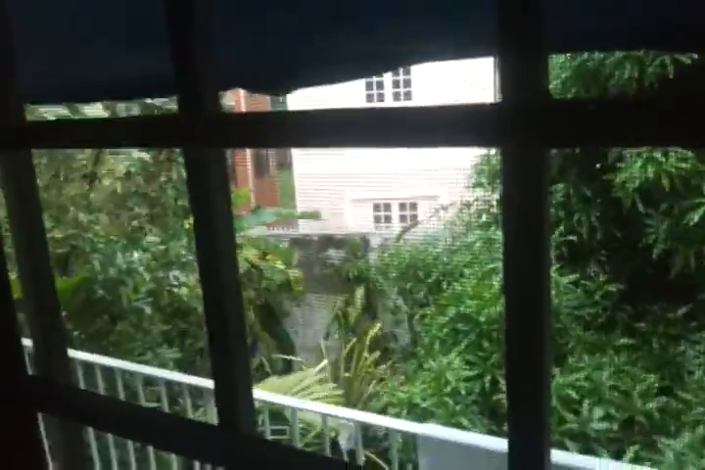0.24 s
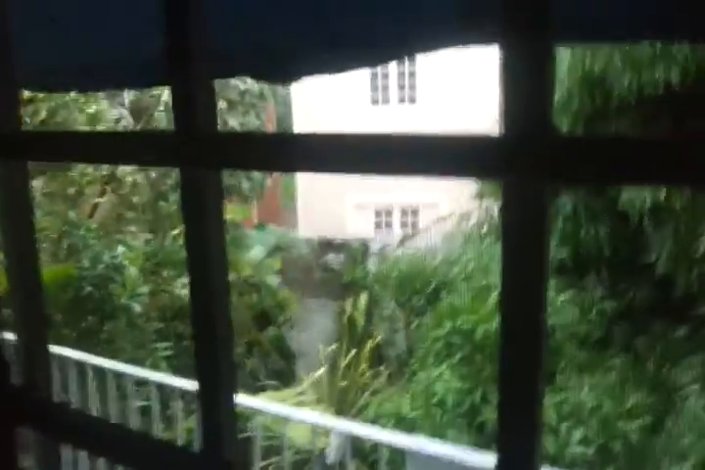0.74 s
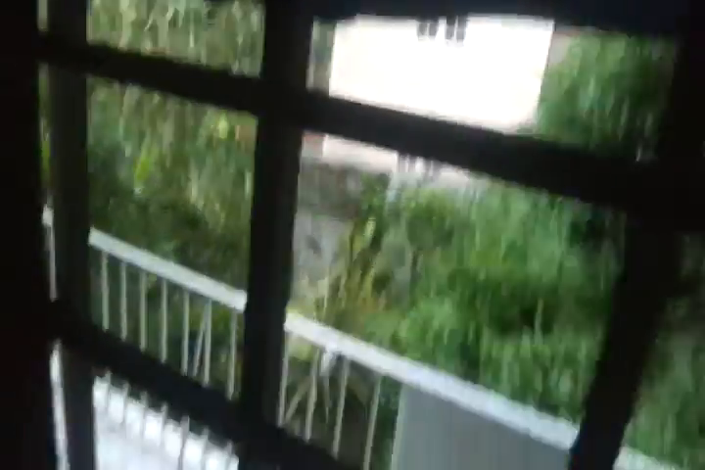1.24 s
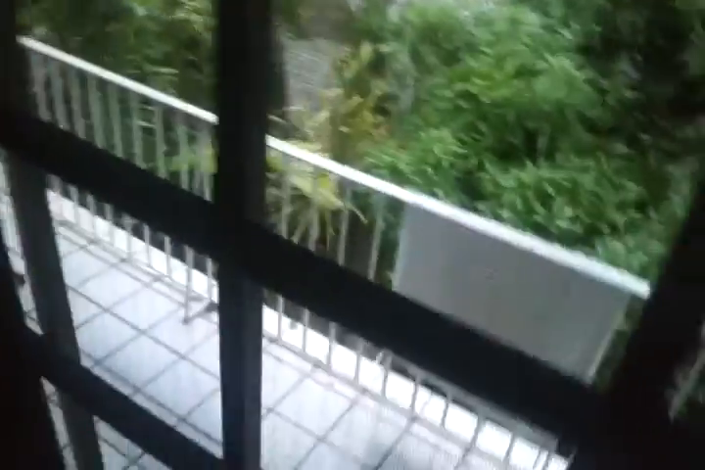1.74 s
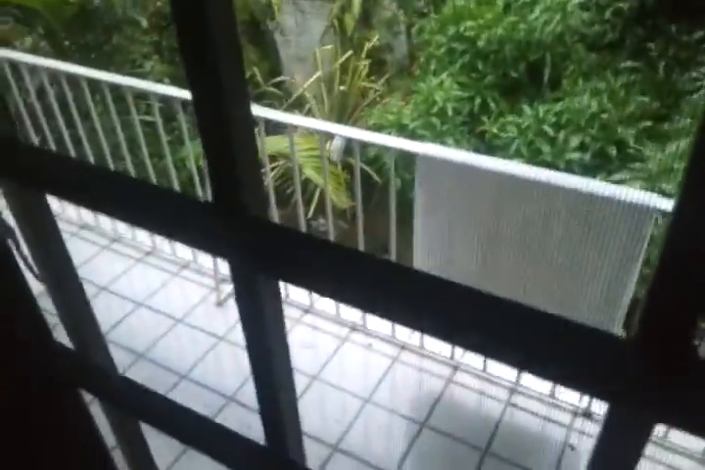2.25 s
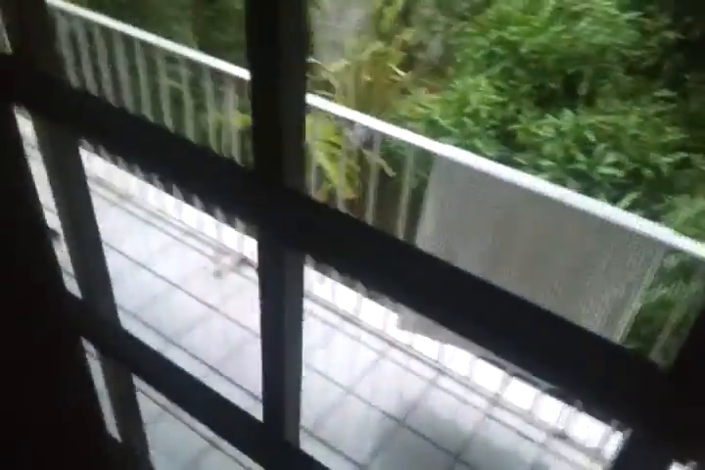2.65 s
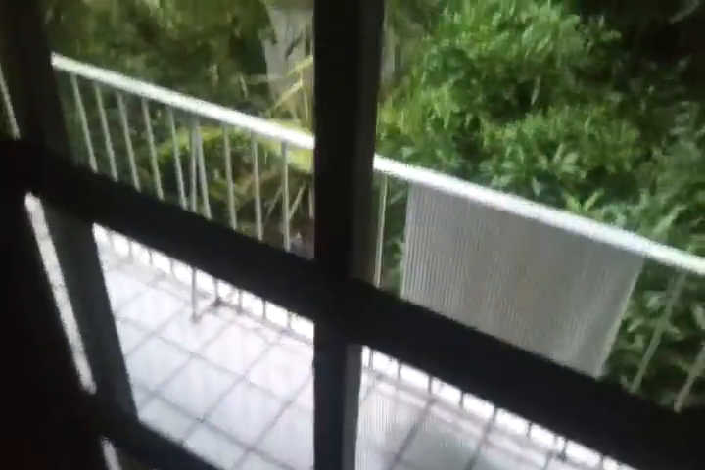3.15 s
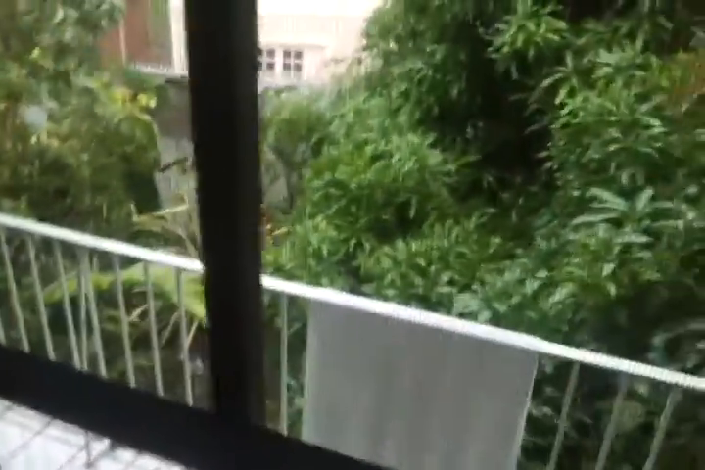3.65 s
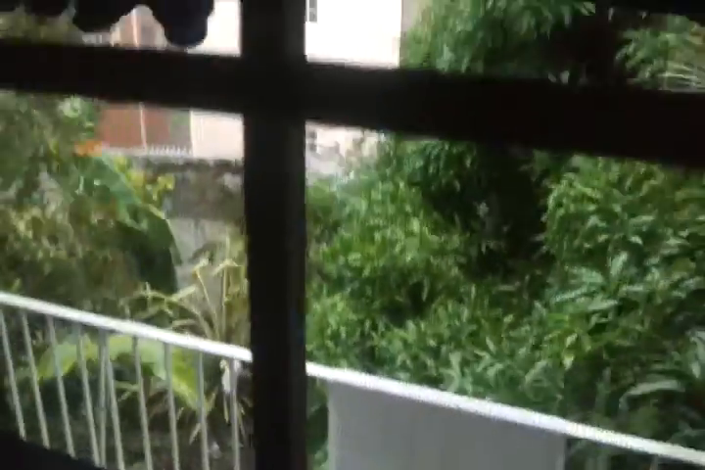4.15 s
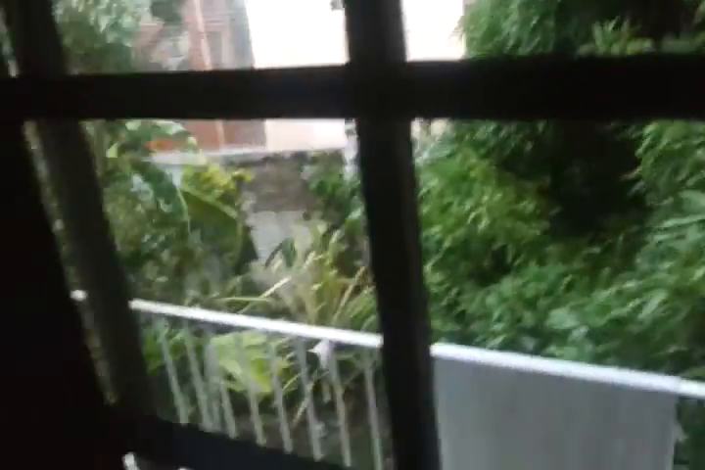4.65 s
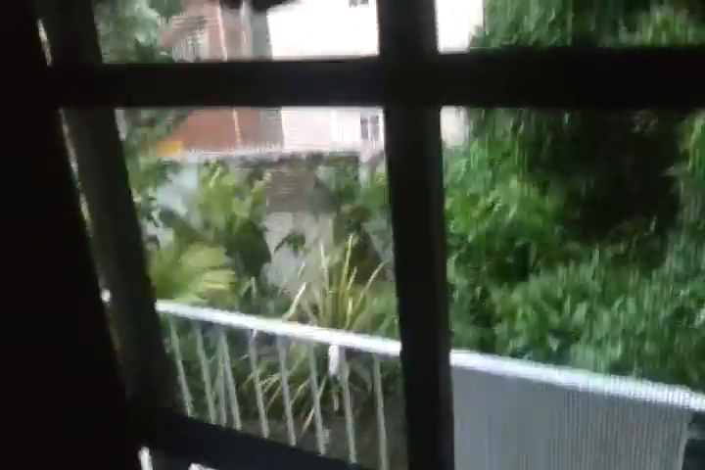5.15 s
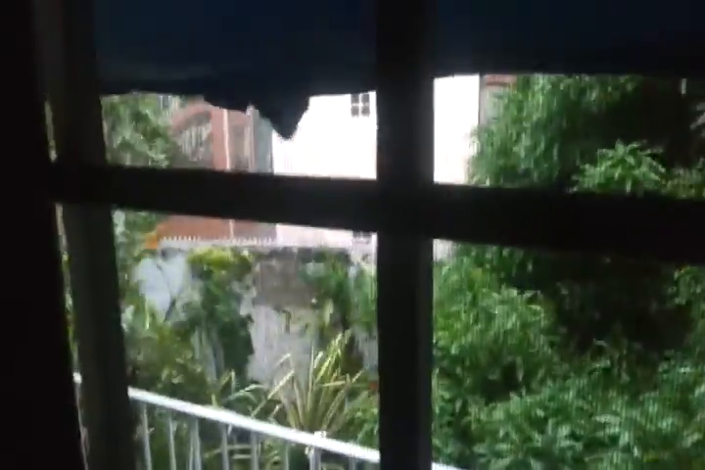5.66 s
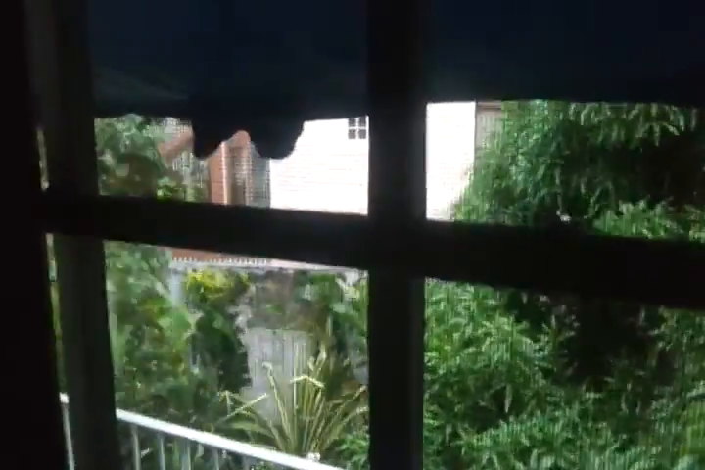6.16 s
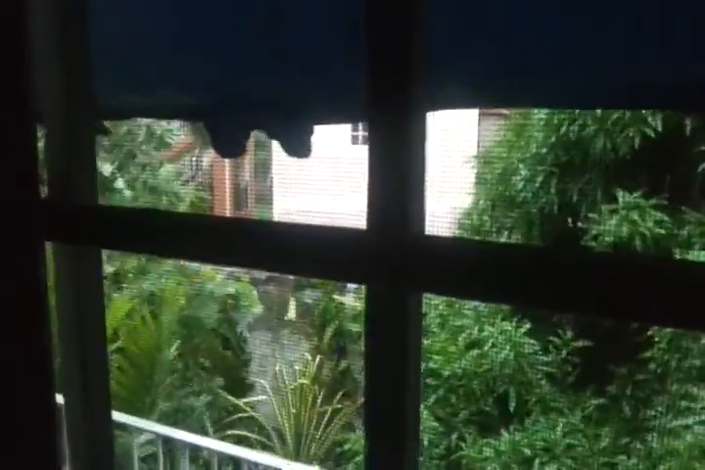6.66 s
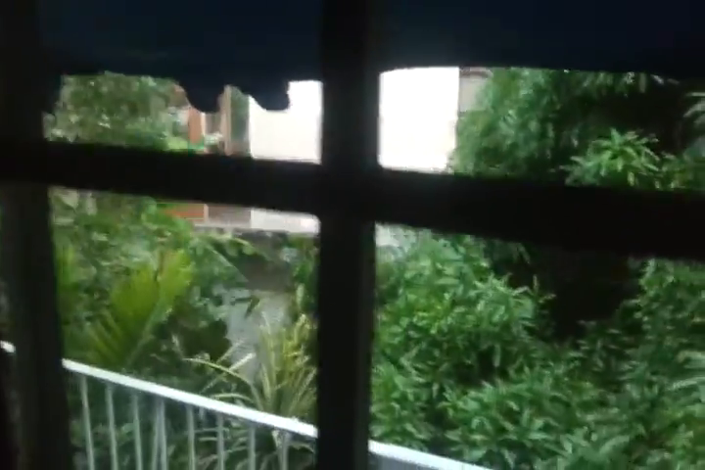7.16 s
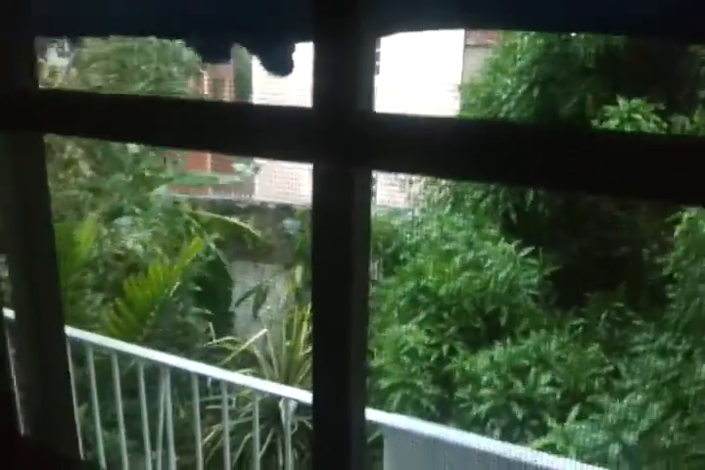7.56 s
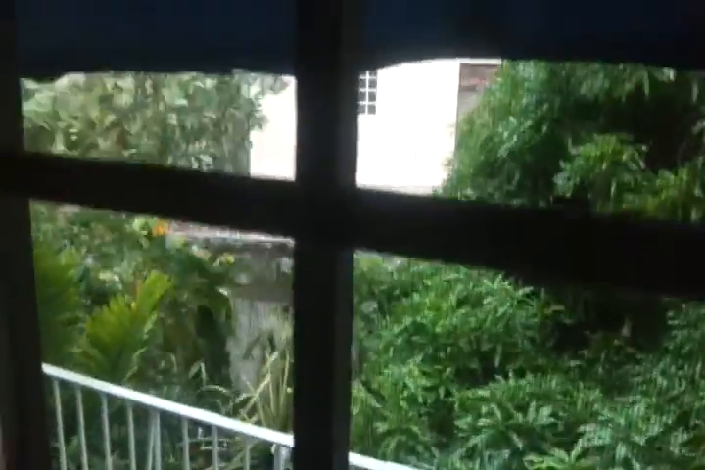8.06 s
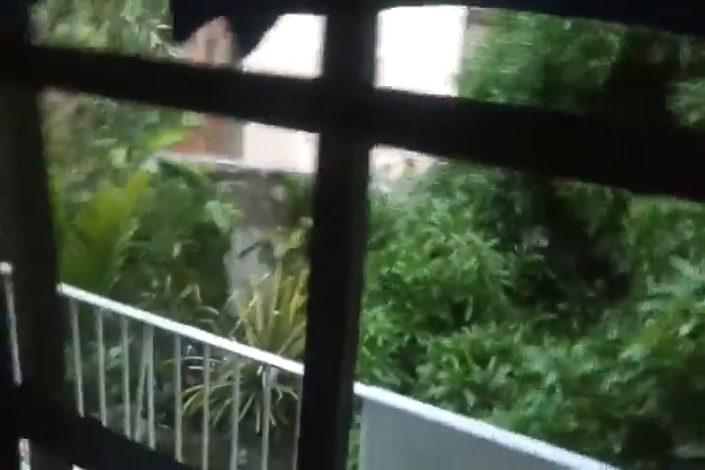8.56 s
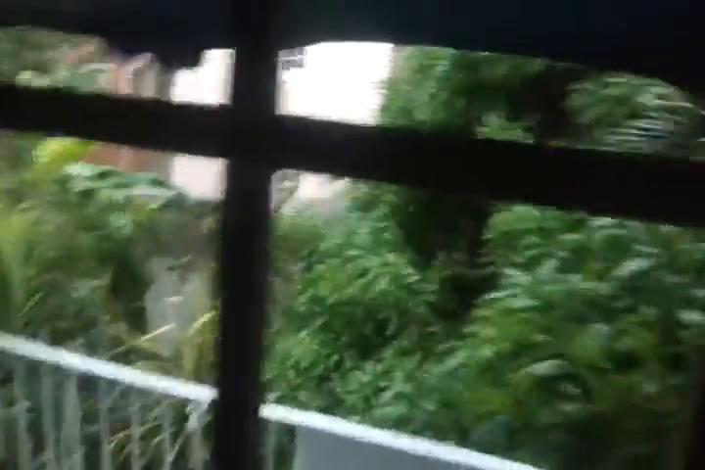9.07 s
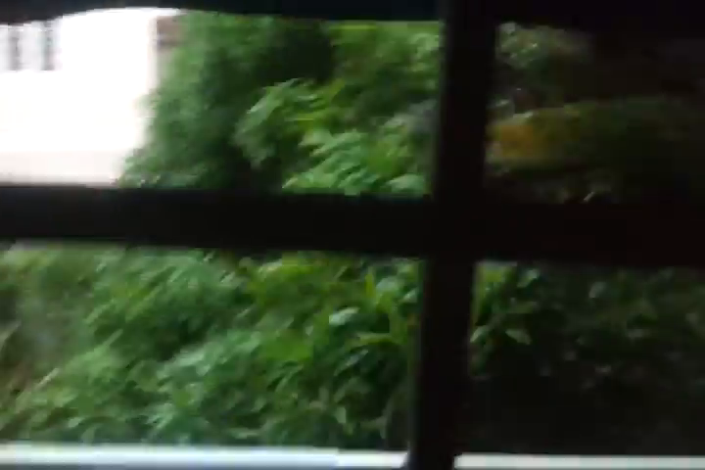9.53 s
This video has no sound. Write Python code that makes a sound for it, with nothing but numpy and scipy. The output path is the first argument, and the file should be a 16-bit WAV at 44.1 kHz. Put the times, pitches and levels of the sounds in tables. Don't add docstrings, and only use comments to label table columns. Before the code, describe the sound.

Storm wind roars through a leafy yard beyond a barred window. A broad, dense hiss with a duller breathy body never stops, rising and falling in gusts. Small soft bumps come early and near four seconds; then, at about six, a fluttering cluster of hard, distorted wind buffets, and another brief one late on. Close, bandwidth-limited handheld microphone, with low rumble beneath.

```python
import sys
import numpy as np
from scipy import signal
from scipy.io import wavfile
from scipy.ndimage import uniform_filter1d

SR = 44100
rng = np.random.default_rng(int(sys.argv[2]) if len(sys.argv) > 2 else 0)


def file_out(sig):
    cols = np.atleast_2d(sig).T
    lim = np.clip(cols, -1, 1)
    pcm = np.round(lim * 32767).astype(np.int16)
    wavfile.write(sys.argv[1], SR, pcm)


def rack_gain(trim_db):
    fader = np.asarray(trim_db, float)
    return 10 ** (fader / 20)


N = 432180

# start_s, dip_hz, crest_hz, shoulder_db, low_rush_db
AIM = [(0.0, 2670, 4720, 1, 0), (0.9, 2790, 4680, 2, -.5), (1.25, 2300, 4230, 2, 0.5),
       (1.6, 1920, 4480, 4.5, .5), (2.1, 1950, 4600, 3.5, -1), (2.6, 1950, 4550, 4.5, -1.5),
       (3.1, 1950, 4570, 2.5, -0.5), (3.6, 2280, 4500, -0.5, -.5), (4.1, 2130, 4470, 0.5, 1),
       (4.6, 2130, 4500, 0, -.5), (5.3, 2190, 4450, 1, -1), (6.2, 2130, 4430, 0.0, .5),
       (7.0, 2200, 4550, 0.5, -1), (8.2, 2200, 4560, 0, -.5), (8.6, 2230, 4500, 0.0, 1.5),
       (9.2, 2200, 4600, 0, -1), (9.6, 2540, 4400, -3.5, 0.5), (9.8, 2660, 4640, -3, 0.0)]


def read(points, hz):
    point_hz, value = np.transpose(points)
    return np.interp(np.log(hz + 1), np.log(point_hz + 1), value)


def evened(x):
    return x / np.sqrt(np.mean(x ** 2) + 1e-20)


def columns(table, t):
    s, *values = np.transpose(table)
    return [np.interp(t, s, v) for v in values]


def add(mix, start, sound):
    part = mix[start:][:len(sound)]
    part += sound[:len(part)]


def grid(size):
    return np.arange(N // (size // 4) + 5) * (size // 4) / SR, np.fft.rfftfreq(size, 1 / SR)[:, None]


def noise(colour_db, band_hz, patchy_db, size):
    t, hz = grid(size)
    real, imaginary, patches = rng.standard_normal((len(t), len(hz), 3)).T
    patches = uniform_filter1d(patches, size=7, axis=0)
    patches = evened(uniform_filter1d(patches, size=15, axis=1))
    gain = rack_gain(colour_db) * np.ones(real.shape)
    inside = (hz > band_hz[0]) & (hz < band_hz[1])
    gain /= np.sqrt((gain ** 2 * inside).sum(0))
    spectra = (real + 1j * imaginary) * gain * rack_gain(patchy_db * patches)
    x = signal.istft(spectra, nperseg=size, noverlap=size * 3 // 4)[1]
    return x[:N] / np.sqrt(8 / 3 * .75)


def lumps(x, hz, depth_db):
    power = uniform_filter1d(uniform_filter1d(x ** 2, size=2600), size=2600)
    steady = x / np.sqrt(np.maximum(power, 1e-6))
    lowpass = signal.butter(4, hz, fs=SR, output="sos")
    quick = signal.sosfilt(lowpass, rng.standard_normal(N))
    return evened(steady * rack_gain(depth_db * evened(quick)))


def gusting():
    # start_s, hiss_db
    gusts = [(0.0, -25.5), (0.22, -23.5), (0.93, -24), (1.25, -26.5), (1.96, -23.5), (2.65, -23.5),
             (3.0, -20), (3.9, -20), (4.2, -17.5), (4.5, -17.5), (5.3, -23), (6.1, -26), (7.2, -22),
             (7.4, -19), (7.92, -22.5), (8.38, -23), (9.17, -19), (9.8, -23)]
    return rack_gain(columns(gusts, np.arange(N) / SR)[0] + 4.5)


def low_rush():
    return rack_gain(columns(AIM, np.arange(N) / SR)[-1])


def far_roar():
    # pitch_hz, density_db (dB per Hz)
    roar_colour = [(50, -62), (120, -24.5), (200, -3), (280, -5.5), (380, -1), (470, -6.5), (600, -11.5),
                   (800, -33.5), (1200, -60), (3000, -140)]
    under_hiss_db, follows = -18, 0.71
    hz = grid(size=2048)[1]
    roar = noise(read(roar_colour, hz), (250, 500), patchy_db=1.0, size=2048)
    roar = lumps(roar, hz=60, depth_db=0.76)
    return rack_gain(under_hiss_db) * gusting() ** follows * low_rush() * roar


def leaves():
    # pitch_hz, density_db (dB per Hz)
    hiss_colour = [(500, -58), (1200, -23), (2000, -10.5), (3500, -8), (5500, -10), (6200, -16),
                   (6900, -24.5), (7350, -31), (7600, -38), (7800, -50.5), (8200, -61), (8500, -47.5),
                   (9000, -61.5), (9500, -130)]
    body_colour = [(150, -54.5), (350, -30.5), (600, -6.5), (800, -1.5), (950, -2.5), (1250, -2.5),
                   (1550, -1.5), (1800, -6), (2200, -8), (3000, -26), (4500, -54), (6500, -140)]
    body_under_db, body_follows = -3.5, 1.095
    t, hz = grid(size=512)
    dip_hz, crest_hz, shoulder_db, _ = columns(AIM, t)
    dip = -3.5 * np.exp(-((hz - dip_hz) / 380) ** 2)
    turned = np.clip((dip_hz - 2300) / 350, 0, 1)
    crest = (5.86 + 1.5 * turned) * np.exp(-((hz - crest_hz - 150 * turned) / 720) ** 2)
    shoulder = shoulder_db * np.exp(-((hz - 3450) / 330) ** 2)
    cavity = 0.95 * np.exp(-((hz - 4330) / 160) ** 2)
    ledge = 3.7 * turned * np.exp(-((hz - 0.69 * dip_hz) / 300) ** 2)
    ragged = np.repeat(rng.standard_normal(len(t) // 22 + 1), 22)[:len(t)]
    gap = -60. * (abs(hz - 8000) < 490 + 100 * ragged)
    hiss_db = read(hiss_colour, hz) + dip + crest + shoulder + cavity + ledge + gap
    hiss = noise(hiss_db, (3000, 6000), patchy_db=0.43, size=512)
    body_db = read(body_colour, hz) + dip + ledge
    body = noise(body_db, (650, 1700), patchy_db=0.22, size=512)
    return gusting() * hiss + rack_gain(body_under_db) * gusting() ** body_follows * low_rush() * body


def port_rumble():
    # start_s, rumble_db
    stream = [(0.5, -36.5), (0.75, -31.5), (1.32, -31), (1.6, -37), (2.45, -36.5), (2.85, -29.5),
              (3.95, -32.5), (4.2, -27), (4.95, -30), (5.25, -42), (5.76, -31.5), (5.95, -24.5), (7.0, -26),
              (7.4, -34), (8.43, -31.5), (8.6, -22), (9.0, -29), (9.8, -32)]
    # pitch_hz, density_db (dB per Hz)
    rumble_colour = [(12, -42), (25, -25.5), (50, 1), (90, -2.5), (150, -1.5), (220, -7.5), (320, -17),
                     (500, -56), (1500, -140)]
    break_up_db = -21
    hz = grid(size=2048)[1]
    rumble = noise(read(rumble_colour, hz), (30, 200), patchy_db=3.0, size=2048)
    rumble = lumps(rumble, hz=41.0, depth_db=2.0)
    rumble_db = np.minimum(columns(stream, np.arange(N) / SR)[0] + 2.76, break_up_db)
    return rack_gain(rumble_db) * rumble


def strikes():
    # start_s, peak_db, pitch_hz, length_ms
    slaps = [(0.855, -10.5, 235, 5.4), (1.329, -12, 160, 6), (4.207, -6, 150, 5.4), (5.956, -5, 217, 15),
             (5.989, 1.5, 140, 7.3), (6.019, -3, 180, 14), (6.105, -6, 202, 4.3), (6.131, 0, 179, 6.7),
             (6.163, 2.5, 190, 7.5), (6.191, 5.5, 140, 15), (6.25, 3, 159, 6.1), (6.276, -4.5, 192, 3.7),
             (6.317, 4.5, 114, 7.5), (6.343, 3, 166, 6.9), (6.371, -5, 180, 12), (6.511, -4, 166, 5.3),
             (6.683, -3.5, 110, 13), (6.904, 1, 141, 6), (7.021, -1.5, 181, 6.3), (7.216, -8.5, 140, 5.8),
             (8.177, -10.5, 122, 12), (8.565, 0.0, 180, 5.2), (8.581, -8, 139, 10), (8.651, 2, 140, 17),
             (8.674, 1.5, 196, 14), (8.692, -3.5, 149.4, 33), (8.701, 2, 150, 5.6), (8.768, -4, 162, 6.1),
             (8.785, 0, 227, 7.6), (8.82, -6.5, 236, 9.1)]
    # start_s, length_s, peak_db, pitch_hz
    flurries = [(0.776, .01, -13, 150), (0.873, .025, -12, 150), (0.956, .03, -14.5, 161),
                (1.258, .015, -11, 150), (1.3, .05, -12.5, 120), (4.14, .055, -12, 145),
                (4.33, .03, -13.5, 152), (4.692, .01, -12, 140), (5.906, .045, -7.5, 157),
                (5.968, .05, -7.5, 180), (6.033, .065, -5.5, 184), (6.148, .035, -5, 188),
                (6.2, .02, -14, 170), (6.288, .01, -11, 169), (6.405, .025, -9.5, 130),
                (6.484, .06, -14, 134), (6.62, .12, -9.5, 100), (6.792, .1, -13, 126),
                (6.917, .04, -8.5, 130), (7.129, .125, -11.5, 119), (8.53, .03, -16, 170),
                (8.6, .03, -18, 172), (8.742, .01, -9, 190), (8.836, .03, -11, 110), (8.873, .04, -8, 170)]
    gap_s, gap_spread, eddy_ms = .016, .25, 10.2
    size_spread_db, pitch_spread = 2, .15
    rows = [(*slap, row) for slap, row in zip(slaps, rng.standard_normal((len(slaps), 44)))]
    chances = rng.standard_normal((len(flurries), 12, 48))
    for (start, length, db, hz), draws in zip(flurries, chances):
        gaps = gap_s * np.exp(gap_spread * draws[:, 44])
        for s, row in zip(np.cumsum(gaps) - gaps[0], draws):
            if s <= length:
                eddy_db = db + size_spread_db * row[45]
                eddy_hz = hz * np.exp(pitch_spread * row[46])
                rows.append((start + s, eddy_db, eddy_hz, eddy_ms * np.exp(0.38 * row[47]), row[:44]))
    return rows


def eddies():
    head_on_start_s, head_on_end_s = 5.93, 6.44
    out, t = np.zeros(N), np.arange(-2000, 2000) / SR
    for s, db, hz, ms, row in strikes():
        steep = .06 + .012 * max(db + 11.5, 0) * (150 / hz) ** 2
        steep += .17 * (head_on_start_s < s < head_on_end_s)
        wander = np.exp(0.33 * np.interp(t, np.linspace(t[0], t[-1], 40), row[4:]))
        angle = 2 * np.pi * np.cumsum(hz * 1.029 * wander) / SR
        angle += 0.38 * row[0] - angle[len(t) // 2]
        bent = angle + np.clip(steep, 0, 1) * 2.88 * (np.sin(angle) + 0.18 * np.sin(2 * angle))
        envelope = np.exp(-np.log(2) * abs(t / (ms / 2000)) ** 1.93)
        swings = np.sign(row[1]) * envelope * np.sin(bent)
        heave_hz = hz * .45 * np.exp(0.38 * row[2])
        heave = np.sin(2 * np.pi * (heave_hz * t + row[3])) * np.exp(-(t / (ms / 1300)) ** 2)
        add(out, round(s * SR) - 2000, rack_gain(db - 3.5) * (swings + rack_gain(-6.5) * heave))
    diaphragm = signal.butter(2, (35, 1100), "bandpass", fs=SR, output="sos")
    return signal.sosfilt(diaphragm, out)


def scene():
    return (far_roar() + leaves() + port_rumble() + eddies())[None]


def band_limit(x):
    return signal.sosfilt(signal.butter(12, 15830, fs=SR, output="sos"), x)


def record(dry):
    clip = .708
    excess = dry - np.clip(dry, -.992 * clip, .992 * clip)
    lowpass = signal.firwin(255, 7300, fs=SR)[None]
    narrow = dry - signal.oaconvolve(excess, lowpass, "same")
    return band_limit(np.clip(narrow, -clip, clip))


dry = scene()
out = record(dry)
file_out(out)
```